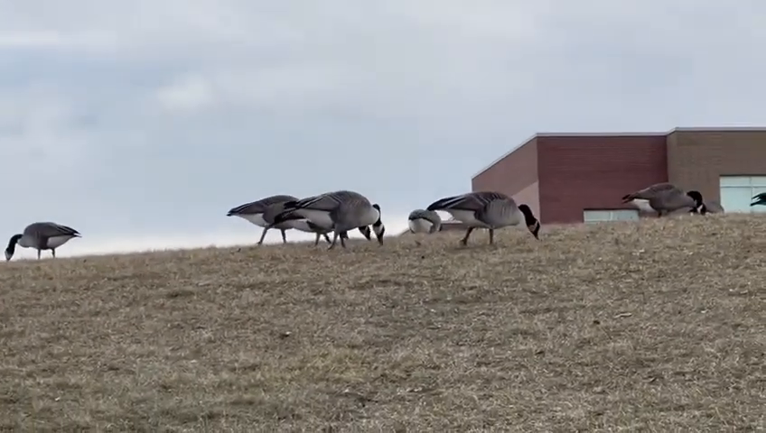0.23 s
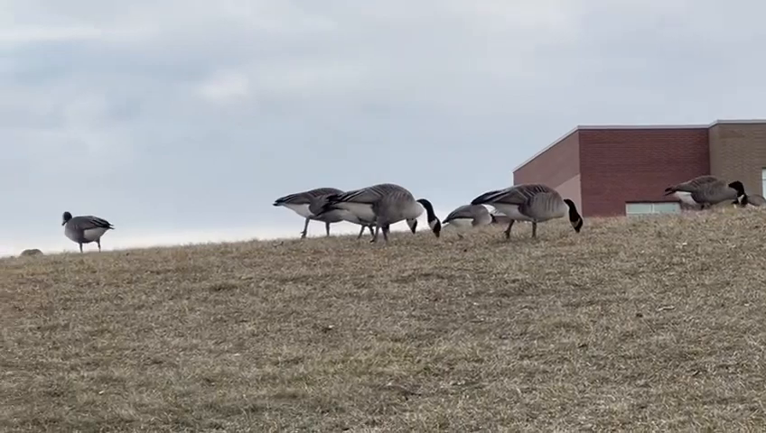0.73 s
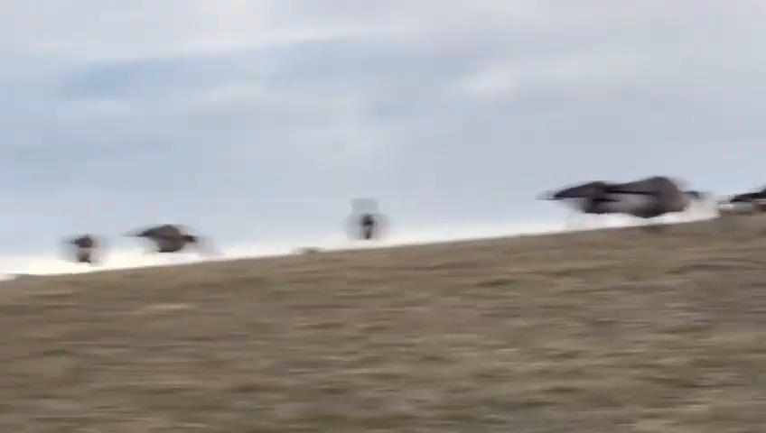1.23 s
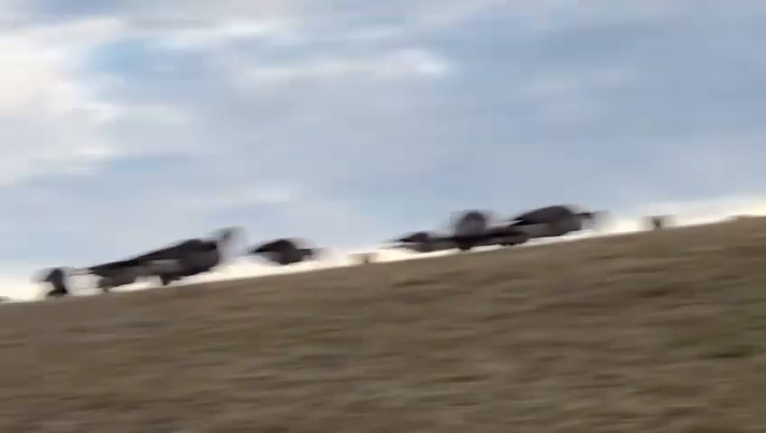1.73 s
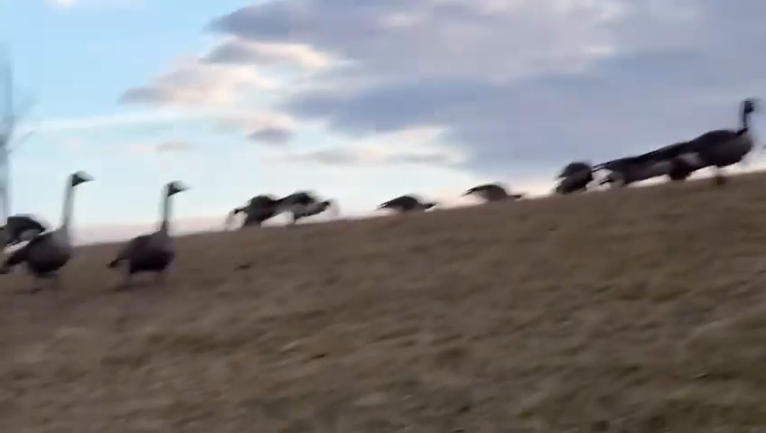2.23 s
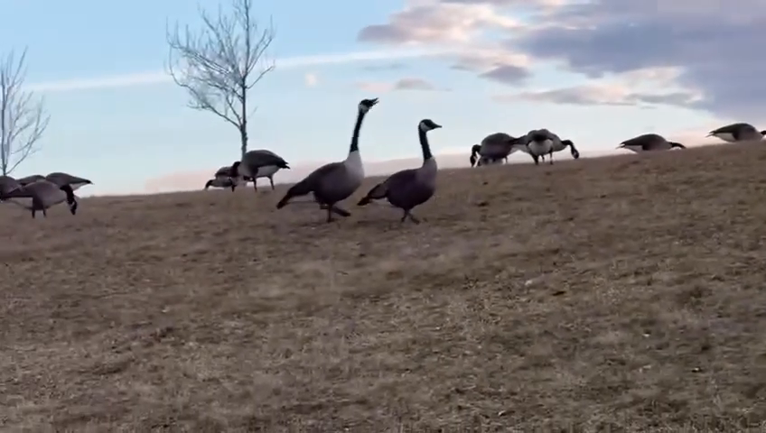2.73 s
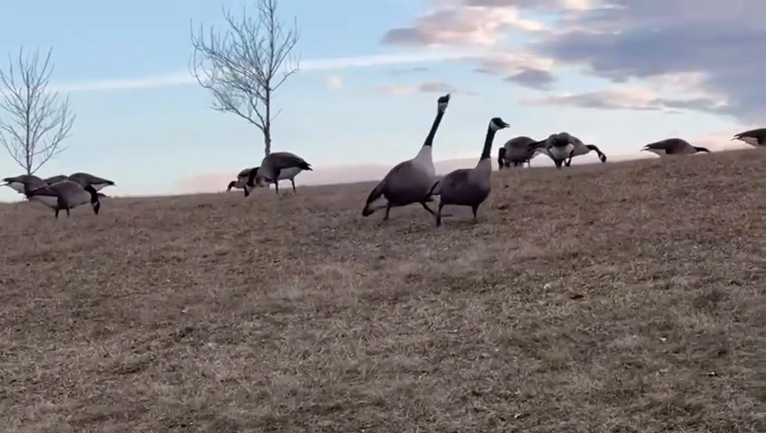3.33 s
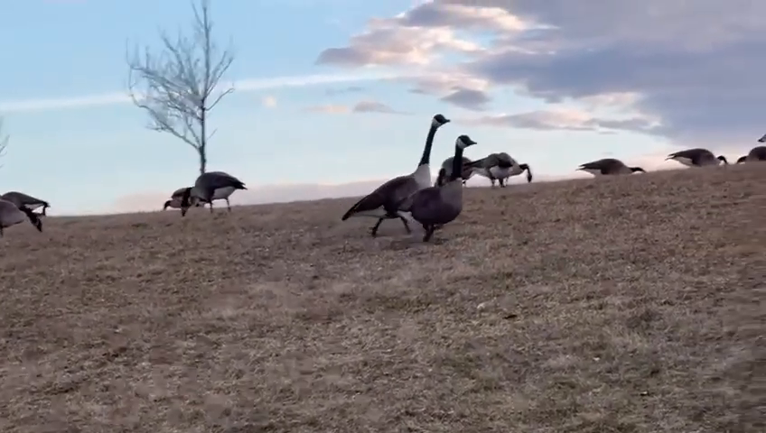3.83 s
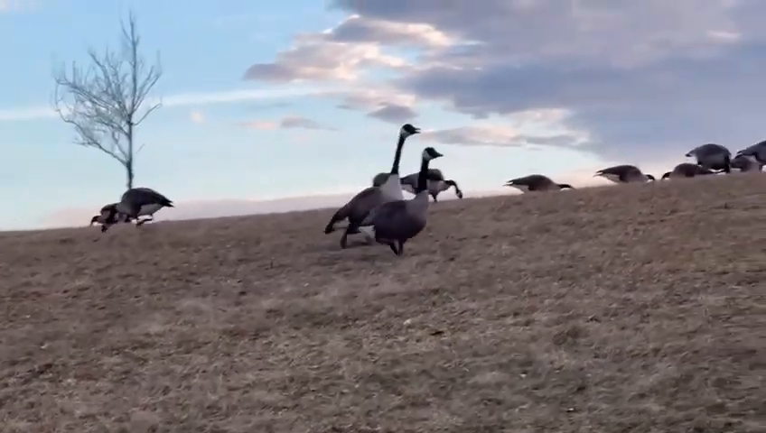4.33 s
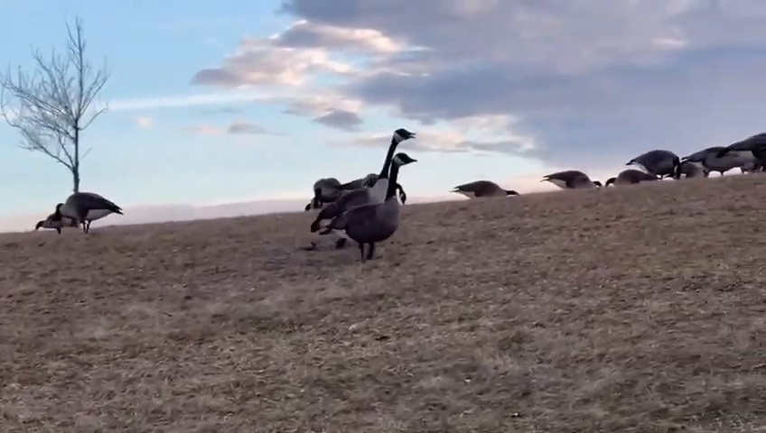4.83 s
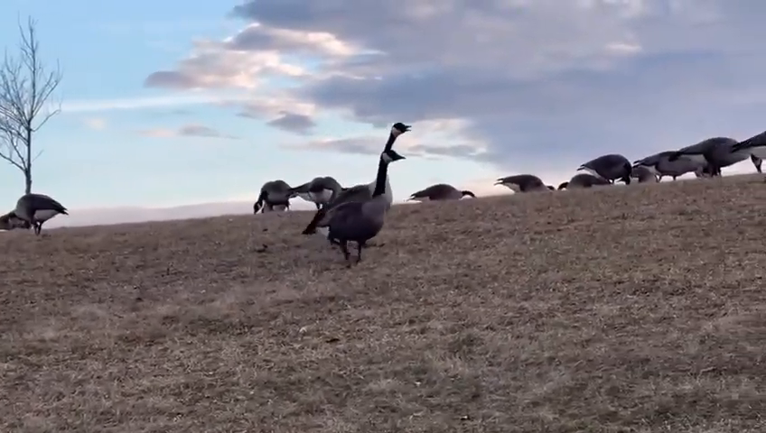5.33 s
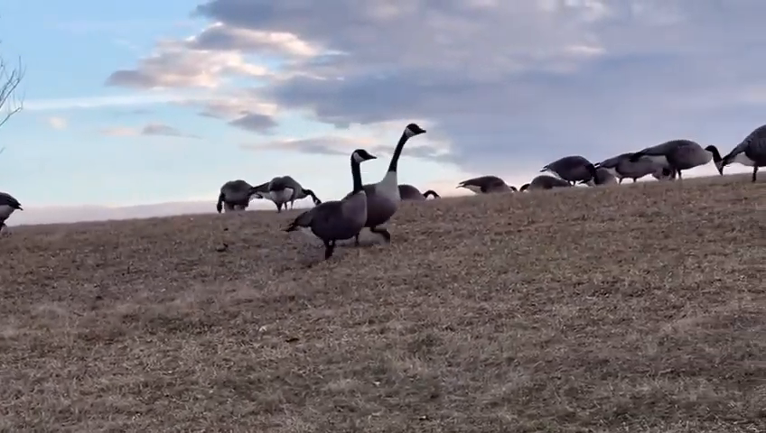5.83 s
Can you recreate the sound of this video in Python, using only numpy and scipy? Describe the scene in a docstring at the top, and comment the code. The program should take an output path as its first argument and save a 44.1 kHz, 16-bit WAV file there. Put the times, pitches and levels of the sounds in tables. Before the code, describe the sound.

Thirteen short, brassy goose honks repeat outdoors, each starting with a raspy growl, over low rumble, with small grunts and dry grass crackles close by.

```python
"""A goose honks again and again on a grassy slope, with a wall some way off that throws the calls back.
Each honk is a rough growl of clicks and fluttering air, then a clear, brassy stack of partials that sags.
Soft grunts fall between, slow pulses shaped by resonances; decaying noise makes grassy and wall echoes.
Something dry crackles close by in bursts of noise, with a faint rustle and two soft knocks.
Filtered noise makes a low rumble, hush and puffs of wind; the microphone turns to face the goose."""
import sys
import numpy as np
from scipy import signal
from scipy.fft import rfft, irfft, next_fast_len
from scipy.io import wavfile

SR = 44100
rng = np.random.default_rng(int(sys.argv[2]) if len(sys.argv) > 2 else 0)


def unload_audio(sound):
    """Save the sound as a 16-bit wav file, at the path given as the first command line argument."""
    columns = np.transpose(np.atleast_2d(sound))
    # keep every value between -1 and 1, then stretch to whole-number steps
    steps = np.round(np.clip(columns, -1, 1) * 32767)
    wavfile.write(sys.argv[1], SR, steps.astype(np.int16))


N = 267731
TIME = np.arange(N) / SR

# honks: growl start t/s, break into the note t/s, end t/s, top pitch f/Hz, note drive level/dB,
# note brass near 5 kHz level/dB, growl rasp near 5 kHz level/dB
HONK_CALLS = [(0.296, 0.359, .402, 653.7, -30.5, -11, -9.5), (0.681, 0.747, .807, 661.5, -28.5, -0.5, -26),
              (1.079, 1.144, 1.194, 658, -28, -7.5, -21.5), (1.639, 1.704, 1.765, 625, -32.5, -9.5, -11.5),
              (2.272, 2.34, 2.389, 615, -31.5, -12.5, -19), (2.707, 2.772, 2.831, 659, -25, -3.5, -24),
              (3.054, 3.112, 3.192, 667, -23.5, 0.5, -14), (3.437, 3.496, 3.565, 668, -24, -9, -8.5),
              (3.983, 4.055, 4.132, 640, -27.5, -10, -19), (4.396, 4.457, 4.522, 656.5, -24.5, -11, -21),
              (4.841, 4.916, 4.981, 658, -24, -8, -18), (5.236, 5.299, 5.369, 665.3, -23, -6, -20.5),
              (5.674, 5.733, 5.802, 649.7, -25, -7.5, -12)]
# how busy the dry rustling is: t/s, hiss level/dB
RUSTLE_ACTIVITY = [(0, -104), (1.1, -100), (1.45, -74), (1.67, -66), (2.05, -78.5), (2.45, -77), (2.8, -74),
                   (3.15, -63.5), (3.97, -73.5), (4.3, -84.5), (4.6, -75.5), (4.83, -79.5), (5.05, -88.5),
                   (6.07, -100)]
RUSTLE_DB = np.interp(TIME, *np.transpose(RUSTLE_ACTIVITY))

GROWL_HZ, FLUTTER_HZ = 469.3, 156   # mid-growl pitch, mean flutter rate
USUAL_DB = -24                      # note drive of an ordinary honk


def from_db(db):
    """Convert decibels to amplitude gain."""
    return 10 ** (np.asarray(db) / 20)


def rms_one(x):
    """Scale to unit rms."""
    return x / np.sqrt(np.mean(x ** 2) + 1e-20)


def at_hz(points, hz):
    """Read a spectrum in dB, interpolated on a log-frequency axis."""
    knots_hz, level_db = np.transpose(points)
    return np.interp(np.log(np.maximum(hz, 1)), np.log(knots_hz), level_db)


def colour(x, points):
    """Filter causally (minimum phase) to the given spectrum: folding the cepstrum supplies the phase."""
    size = 2 * next_fast_len(x.shape[-1] // 2 + 2048)
    bins_hz = np.arange(size // 2 + 1) * SR / size
    cepstrum = irfft(np.log(from_db(at_hz(points, bins_hz))))
    cepstrum[1:size // 2] *= 2
    cepstrum[size // 2 + 1:] = 0
    response = np.exp(rfft(cepstrum))
    return irfft(rfft(x, size) * response)[..., :x.shape[-1]]


def drift(rate_hz, size):
    """Join random values, drawn rate_hz times a second with unit spread, by straight lines."""
    steps = np.arange(size) * rate_hz / SR
    count = int(steps[-1]) + 2
    return np.interp(steps, np.arange(count), rng.standard_normal(count))


def ramp(t, length):
    """Step smoothly from 0 at t = 0 to 1 at t = length."""
    return np.sin(np.pi / 2 * np.clip(t / length, 0, 1)) ** 2


def window(start, end):
    """Slice the samples round a call, with room for its rise and ring."""
    return slice(max(int((start - .03) * SR), 0), min(int((end + .04) * SR), N))


def clear_notes(sag=.15, droop_db=3, fade_db=13, brass_fade_db=11, scoop=.11, rough=.044, settle_s=.006,
                jitter=.0022, flutter=.67, lead_s=.021, attack_s=.018, lead_db=-9, bloom_s=.013,
                shimmer_db=1.67):
    """Membranes snapping shut each cycle give 18 partials; as pressure runs out they sag, upper ones first to die."""
    # throat resonances: f/Hz, level/dB
    throat = [(300, -37.5), (620, -14.5), (830, -17.5), (1000, -6.5), (1150, -0.5), (1400, 1), (2000, 2.5),
              (2600, -13), (3250, -24), (3900, -4.5), (5300, -7), (5950, -12), (6900, 0.5), (8200, -15.5),
              (9800, -11), (11500, -23.5)]
    usual_hz, usual_brass_db = 657.4, -3.5
    # a tense, high note holds its pitch longer: sag exponent when slack and at the usual pitch
    slack_hold, usual_hold = 1.6, 3.72
    hold_doubles_hz = 11   # pitch rise that doubles the exponent's excess over slack
    # one brightness drives the upper partials: lift in an ordinary honk, dB gained per dB of brass
    ring_usual_db, ring_follows = -8, .27    # near 2 kHz
    edge_usual_db, edge_follows = -13, 1.87  # above 6 kHz
    out, k = np.zeros(N), np.arange(1, 19)[:, None]
    for _, start, end, top_hz, level_db, brass_db, _ in HONK_CALLS:
        span = window(start, end)
        t = TIME[span] - start
        spent = np.clip(t / (end - start), 0, 1.25)
        unsettled = 1 / (1 + np.exp(t / settle_s))   # near 1 in the shuddering lead-in, 0 once clear

        hold = slack_hold + (usual_hold - slack_hold) * 2 ** ((top_hz - usual_hz) / hold_doubles_hz)
        glide = 1 - scoop * unsettled ** 2 - sag * np.minimum(spent ** hold, 1.2)
        hz = top_hz * glide * (1 + (jitter + rough * unsettled) * drift(1200, len(t)))

        ring_db = ring_usual_db + ring_follows * (brass_db - usual_brass_db)
        edge_db = edge_usual_db + edge_follows * (brass_db - usual_brass_db)
        # the first point keeps the fundamental about equally strong in soft and loud honks
        effort = [(750, -.8 * (level_db + 27.5)), (1100, .0018), (1400, .016), (1700, ring_db),
                  (2700, ring_db), (3800, brass_db), (5600, brass_db), (6500, edge_db)]
        upper = np.clip(np.log2(k / 3), 0, None)   # octaves above the third harmonic
        dying_db = droop_db * spent + fade_db * np.log2(k) ** .5 * spent ** 5
        dying_db = dying_db + brass_fade_db * upper * spent ** 3
        blooming_db = (1 + .6 * upper) * lead_db * (1 - ramp(t + bloom_s / 3, bloom_s))
        shimmer = shimmer_db * np.minimum(upper, 1) * np.array([drift(71, len(t)) for _ in k])
        gain = from_db(level_db + at_hz(effort, k * hz) + blooming_db - dying_db + shimmer)

        gate = ramp(t + lead_s, attack_s) * ramp(end - start + .018 - t, .026)
        shake = 1 + flutter * unsettled * np.cos(2 * np.pi * (FLUTTER_HZ * t + rng.random()))
        rotation = np.exp(2j * np.pi * k * np.cumsum(hz) / SR)
        partials = np.real(hoarseness(k, level_db, unsettled + spent ** 4) * rotation)
        out[span] += np.sqrt(2) * gate * shake * np.sum(gain * partials, axis=0)
    return -colour(out, throat)


def hoarseness(k, level_db, wobbly, middle_shake=.01, ends_shake=.096, top_harmonic=9, softness=.55):
    """Cycles close unevenly: high harmonics, wobbly note ends and soft honks shake most."""
    loudness_factor = from_db(-softness * (level_db - USUAL_DB))
    depth = (middle_shake + ends_shake * wobbly) * np.minimum(k, top_harmonic) * loudness_factor
    depth = np.minimum(depth, 1)
    size = len(wobbly)
    chance = np.array([drift(700, size) + 1j * drift(700, size) for _ in k])
    return (1 + depth * chance) / np.sqrt(1 + depth ** 2)


def pulses(hz, jitter, size):
    """Make an uneven train of about unit-power clicks, and the phase within each cycle in turns."""
    turns = rng.random() + np.cumsum(hz * (1 + jitter * drift(hz, size))) / SR
    clicks = np.diff(np.floor(turns), prepend=0) * np.sqrt(SR / np.mean(hz))
    return clicks, turns % 1


def voiced(source, throat, rasp_db):
    """Filter by throat resonances, the upper ones raised by rasp_db; 500 Hz of noise at 0 dB has unit power."""
    shaped = [(hz, db + rasp_db * ramp(hz - 2200, 1800)) for hz, db in throat]
    return colour(source, shaped) * np.sqrt(SR / 2 / 500)


def growls(jitter=.03, tone_db=-2, slap_db=-8, air_db=-13, kick_db=7, swell_db=9, glide_per_s=1.3,
           slump_db=5.0, attack_s=.012, hum_db=-45):
    """Membranes start with a knock, then a rough tone and slow flutter, swelling before the voice breaks."""
    # throat resonances in the growl: f/Hz, level/dB
    growl_throat = [(250, -37.5), (480, -3.5), (760, -18), (970, -1), (1270, 6), (1600, -20.5),
                    (1950, -6.5), (2500, -23), (3300, -24.5), (4000, -5.5), (4900, -6), (6000, -18),
                    (7000, -15), (8000, -23.5), (11000, -41)]
    usual_growl_db, growl_follows = -38, .73   # drive before an ordinary honk; dB per dB of the note
    out = np.zeros(N)
    for start, top, _, _, note_db, _, rasp_db in HONK_CALLS:
        level_db = usual_growl_db + growl_follows * (note_db - USUAL_DB)
        span = window(start, top)
        t = TIME[span]
        pitch_hz = GROWL_HZ * (1 + glide_per_s * (t - (start + top) / 2))
        tone, cycle = pulses(pitch_hz, jitter, len(t))
        slaps, beat = pulses(FLUTTER_HZ, .16, len(t))
        air = rng.standard_normal(len(t)) * 2 * np.exp(-2 * beat)   # a puff per flutter beat

        kick = kick_db * (1.5 - ramp(t - start - .007, .0066))
        swell = swell_db * ramp(t - top + .025, .0061)
        flutter = from_db(kick + swell) * (from_db(slap_db) * slaps + from_db(air_db) * air)
        source = from_db(tone_db) * tone * (1 + .6 * drift(300, len(t))) + flutter
        slump = from_db(-slump_db * ramp(t - start - .016, .03))
        gate = ramp(t - start + .002, attack_s) * ramp(top + .008 - t, .012)
        # the lowest partial has the same drive in every call
        hum = from_db(hum_db) * np.sqrt(2) * np.cos(2 * np.pi * cycle)
        out[span] += hum * gate * ramp(t - start, .018)
        out[span] += from_db(level_db) * voiced(source * gate * slump, growl_throat, rasp_db)
    return out


def grunts(rate_hz=160, air_db=-7, windpipe_db=-9, knock_db=7):
    """Slack membranes rattle in slow, uneven pulses; one delayed copy stands for the long windpipe."""
    # grunts between honks: start t/s, end t/s, drive level/dB
    grunt_calls = [(.035, .09, -56.5), (.24, .334, -54.5), (.505, 0.576, -54), (.86, 0.926, -51),
                   (2.52, 2.632, -53), (2.897, 2.979, -45.5), (3.285, 3.352, -43), (4.21, 4.271, -44.5),
                   (4.675, 4.78, -51), (5.05, 5.126, -47.5), (5.885, 5.965, -48)]
    # throat resonances in the grunt: f/Hz, level/dB
    grunt_throat = [(250, -14), (500, -1), (880, -17), (1350, 2), (1750, -11), (2200, -16), (2500, -15),
                    (3100, -10.5), (3700, -18.5), (4700, -1), (6300, -12), (7100, -23), (11000, -46)]
    # hiss near 5 kHz grows more slowly than the grunt itself
    usual_hiss_db, hiss_follows, usual_grunt_db = -71.5, .55, -46.5
    out = np.zeros(N)
    for start, end, level_db in grunt_calls:
        rasp_db = usual_hiss_db + hiss_follows * (level_db - usual_grunt_db) - level_db
        span = window(start, end)
        t = TIME[span]
        slaps, beat = pulses(rate_hz, .07, len(t))
        air = rng.standard_normal(len(t)) * 2 * np.exp(-2 * beat)
        source = slaps * from_db(2 * drift(120, len(t))) + from_db(air_db) * air
        source = source + from_db(windpipe_db) * np.interp(t - 1 / GROWL_HZ, t, source)
        swell = ramp(t - start + .008, .028) * ramp(end + .01 - t, .03)
        # only a hard grunt begins with a knock
        hardness = ramp(level_db + 45, 4)
        knock = hardness * ramp(t - start - .002, .003) * ramp(start + .018 - t, .012)
        force = swell + from_db(knock_db) * knock
        out[span] += from_db(level_db) * voiced(source * force, grunt_throat, rasp_db)
    return out


def goose_at_ports(goose, turn_at_s=1.25, turn_takes_s=.35):
    """The microphone turns from a goose off to the left, deeply notched at the right port, to face it."""
    # right port's spectrum before the turn: f/Hz, level/dB
    far_port = [(300, 3.5), (650, -0.5), (1000, -8), (1220, -18), (1320, -27.5), (1430, -0.5), (1650, -3.5),
                (1950, 7), (2700, 0), (4000, 2)]
    facing = ramp(TIME - turn_at_s, turn_takes_s)
    right = facing * goose + (1 - facing) * colour(goose, far_port)
    lean = [(500, 1.6), (1300, .7), (2000, -.4), (5000, -.1)]   # f/Hz, left minus right level/dB
    left_half = [(hz, db / 2) for hz, db in lean]
    right_half = [(hz, -db / 2) for hz, db in lean]
    return np.array([colour(goose, left_half), colour(right, right_half)])


def echoes(x, ground_db=-27, ground_s=.017, wall_db=-29, wall_s=.094, tail_t60_s=.32):
    """Grass scatters a little at once; the wall answers later and dies away, both as decaying noise."""
    t = TIME[:SR]
    near = np.exp(-t / ground_s) * ramp(t, .0042)
    far = ramp(t - wall_s + .0087, .012) * from_db(-60 * t / tail_t60_s)
    shape = (from_db(ground_db) * rms_one(near) + from_db(wall_db) * rms_one(far)) / np.sqrt(SR)
    mid, side = rng.standard_normal((2, SR))
    response = shape * (mid + side * np.array([[1], [-1]]))   # scatter differs between the ears
    scattered = signal.fftconvolve(x[None], response, axes=1)[:, :N]
    return colour(scattered, [(500, -4.5), (1300, .5), (2000, -5.5), (4500, -11.5), (10000, -14.5)])


def crackles(snap_s=.0016, crumble_s=.0031, crumble_db=-20, tint_db=3, after_snap_s=.008, loss_db=7.5):
    """Dry breaks give one to three ever weaker noise snaps, each with a crumbling tail and its own colour."""
    # the sharpest crackles: t/s, first snap drive level/dB
    sharp_crackles = [(1.686, -37), (1.9648, -41), (2.169, -39), (2.2083, -42.5), (2.3825, -35),
                      (2.4484, -43.5), (2.534, -39), (3.205, -39), (3.288, -40.5), (3.405, -36),
                      (3.707, -40), (3.724, -42.5), (3.7339, -37.5), (3.7645, -36.5), (3.8015, -38.5),
                      (3.8298, -35), (3.952, -39), (3.9717, -33.5), (3.9902, -36), (4.599, -44.5),
                      (4.6533, -41), (4.7878, -35.5), (4.803, -40), (4.899, -43), (5.1722, -44.5),
                      (5.444, -44.5)]
    # snap spectrum: f/Hz, level/dB
    crackle_colour = [(500, -10), (1800, -0.5), (4500, -5), (7000, 1.5), (9500, 4), (11000, -4.5),
                      (12300, -33)]
    out = np.zeros(N)
    for s, level_db in [*sharp_crackles, *small_crackles()]:
        for _ in range(rng.integers(1, 4)):
            span = window(s, s)
            age = TIME[span] - s
            decay = np.exp(-np.abs(age) / snap_s)
            decay = decay + from_db(crumble_db) * np.exp(-np.abs(age) / crumble_s)
            tint = [(hz, db + tint_db * rng.standard_normal()) for hz, db in crackle_colour]
            snap = (age >= 0) * decay * rng.standard_normal(len(age))
            out[span] += from_db(level_db) * colour(snap, tint)
            s = min(s + after_snap_s * rng.uniform(.5, 1.5), TIME[-1])
            level_db = level_db - loss_db
    return out


def small_crackles(busy_db=-72, most_per_s=33, mean_db=-53.5, spread_db=5.5):
    """Draw lesser crackles (t/s, level/dB) at random, more often the busier the rustle, up to busy_db."""
    busy = np.minimum(from_db(RUSTLE_DB - busy_db), 1)
    times = TIME[rng.random(N) < most_per_s * busy / SR]
    return [(s, mean_db + spread_db * rng.standard_normal()) for s in times]


def knocks():
    """A light, damped touch close by: a filtered impulse."""
    # soft dull knocks: t/s, impulse level/dB
    touches = [(1.371, -31), (2.247, -14)]
    # knock spectrum: f/Hz, level/dB
    knock_colour = [(150, -1), (500, 13), (1100, 5), (2200, -16), (4000, -34), (9000, -42)]
    out = np.zeros(N)
    for s, level_db in touches:
        out[int(s * SR)] = from_db(level_db)
    return colour(out, knock_colour)


def rustle(per_s=110, hiss_db=-3):
    """Many far smaller snaps, random impulses over noise, merge into a faint hiss."""
    # hiss spectrum: f/Hz, level/dB
    rustle_colour = [(1000, -12), (3000, -4), (5500, -3), (8500, 0), (10000, -5), (12000, -17)]
    sizes = from_db(6 * np.minimum(rng.exponential(1, N), 4)) * rng.choice([-1, 1], N)
    snaps = (rng.random(N) < per_s / SR) * sizes
    source = rms_one(snaps) + from_db(hiss_db) * rng.standard_normal(N)
    return from_db(RUSTLE_DB) * rms_one(colour(source, rustle_colour))


def wide_noise(points, side_db):
    """Make coloured noise of unit rms; side_db sets how much the two ears differ."""
    mid, side = rng.standard_normal((2, N))
    return rms_one(colour(mid + from_db(side_db) * side * np.array([[1], [-1]]), points))


def background(breeze_db=-47.5, rumble_start_db=-43, rise_db_per_s=.4355, hush_db=-56.5):
    """Coloured noise: wind puffs on the microphone, slowly growing air and far rumble, open-ground hush."""
    # puffs of wind: centre t/s, Gaussian sigma t/s, deep buffeting level/dB, rumble level/dB
    gusts = [(1.44, 0.092, -37.5, -36.5), (1.68, 0.081, -30.5, -37.5), (4.78, 0.039, -51, -37.5),
             (5.58, .06, -44, -40.5), (5.9, 0.052, -41, -29)]
    # noise spectra: f/Hz, level/dB
    wind_colour = [(12, -14.5), (25, 8.5), (38, 14), (52, 21), (66, 24.5), (90, -2), (200, -31), (600, -50),
                   (4000, -100)]
    rumble_colour = [(15, -45.5), (40, -24.5), (72, 2), (100, -1.5), (122, -1), (150, -7.5), (200, -15),
                     (300, -22), (500, -44.5), (1000, -48), (4000, -100)]
    field_colour = [(150, -11.5), (250, -1), (400, -7), (800, -9), (1300, -15.5), (1640, -20.5),
                    (1950, -21), (2600, -31.5), (3700, -39.5), (7000, -41.5), (9000, -48.5), (12000, -66)]
    wind_gain = from_db(breeze_db + rise_db_per_s * TIME)
    rumble_gain = from_db(rumble_start_db + rise_db_per_s * TIME)
    for s, sigma_s, deep_db, rumble_db in gusts:
        puff = np.exp(-.5 * ((TIME - s) / sigma_s) ** 2)
        wind_gain = np.hypot(wind_gain, from_db(deep_db) * puff)
        rumble_gain = np.hypot(rumble_gain, from_db(rumble_db) * puff)
    wind = wind_gain * wide_noise(wind_colour, side_db=-19)
    rumble = rumble_gain * wide_noise(rumble_colour, side_db=-19)
    hush = from_db(hush_db) * wide_noise(field_colour, side_db=-6)
    return (wind + rumble + hush) * from_db([[.3], [-.3]])   # leans slightly left


def scene():
    """The goose starts off to the left and ends up ahead, its low notes still leaning a little left."""
    goose = clear_notes() + growls() + grunts()
    close_by = crackles() + knocks() + rustle()
    return goose_at_ports(goose) + echoes(goose) + close_by + background()


def record(dry, cutoff_hz=12300):
    """Two microphone ports differ in phase, set by a lag on the left; a steep low-pass cuts the top."""
    # lag of the left port: f/Hz, phase/rad
    port_lag = [(0, 0), (700, -.1), (1100, .3), (1500, .2), (2200, 0), (2700, -.25), (4200, -.3),
                (6000, -.05), (8500, 0), (9200, 1.8), (10200, 3.1), (11000, 5.2), (12000, 6.2)]
    size = 2 * next_fast_len(N // 2 + 2048)
    bins_hz = np.arange(size // 2 + 1) * SR / size
    lag_rad = np.interp(bins_hz, *np.transpose(port_lag))
    left = irfft(rfft(dry[0], size) * np.exp(-1j * lag_rad))[:N]
    low_pass = signal.ellip(10, .05, 70, cutoff_hz, fs=SR, output="sos")
    return signal.sosfiltfilt(low_pass, np.array([left, dry[1]]))


dry = scene()
out = record(dry)
unload_audio(out)
```